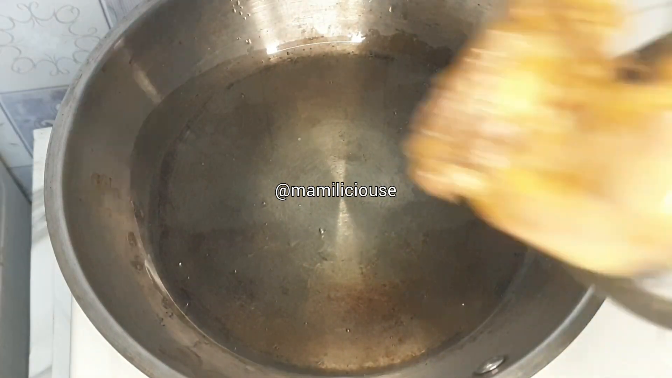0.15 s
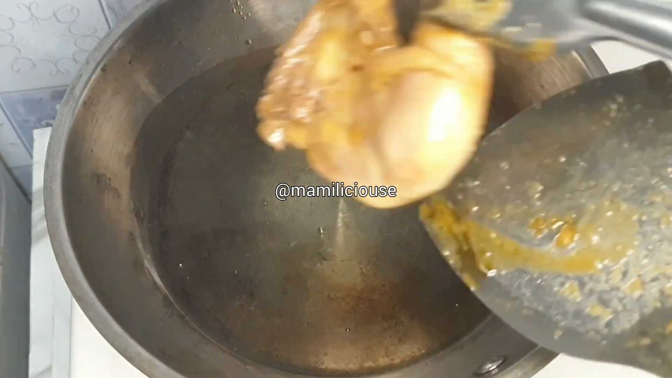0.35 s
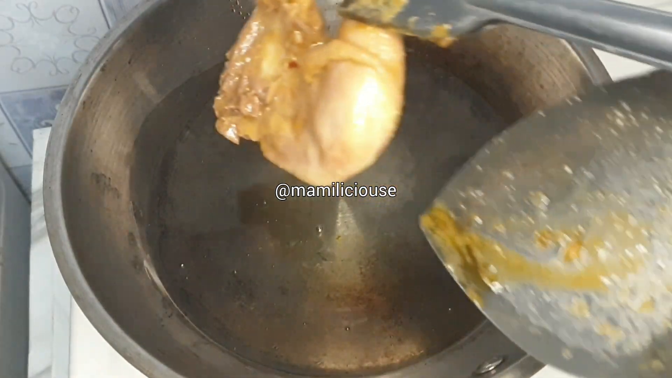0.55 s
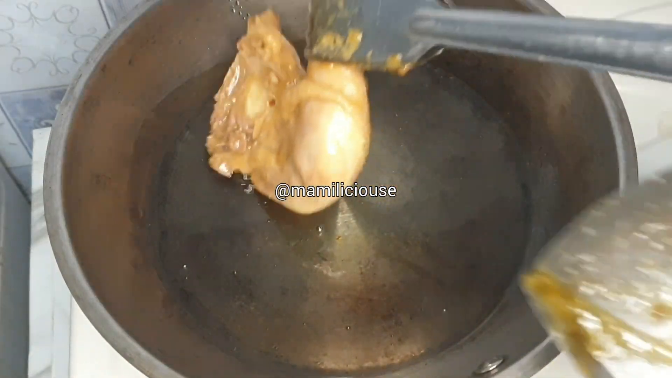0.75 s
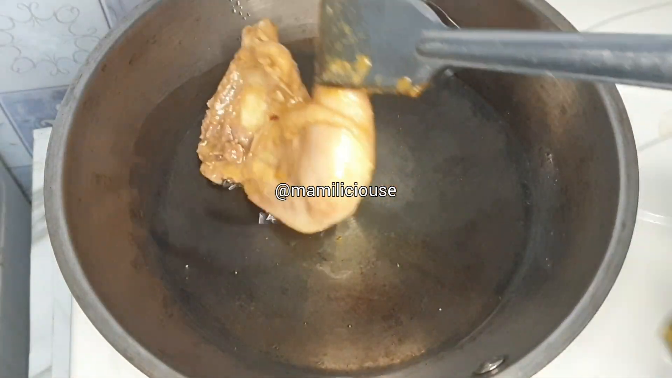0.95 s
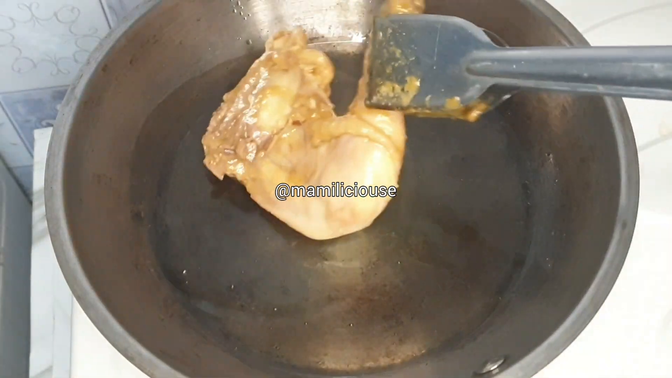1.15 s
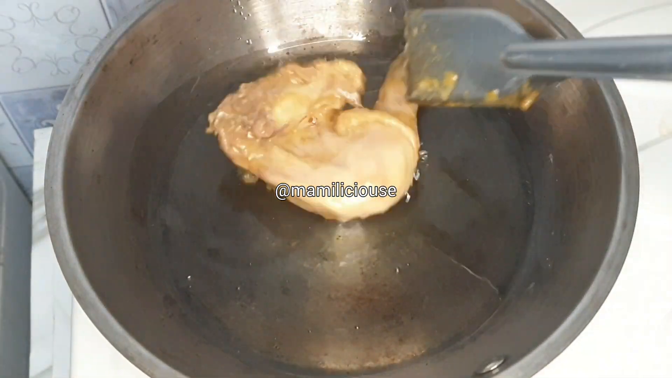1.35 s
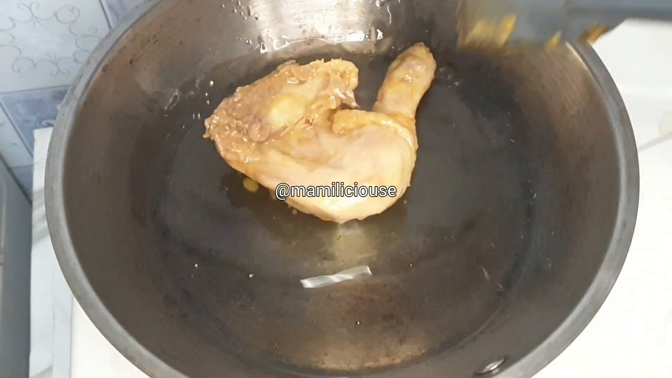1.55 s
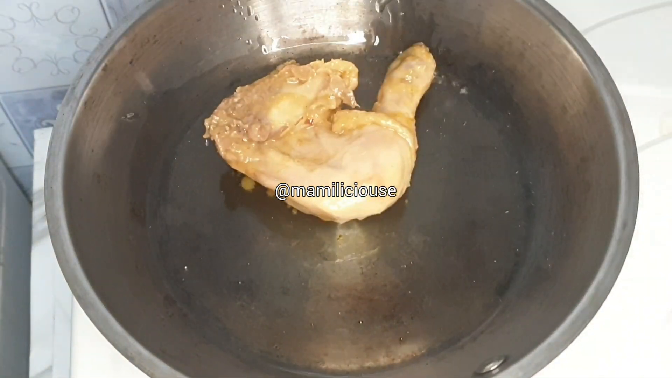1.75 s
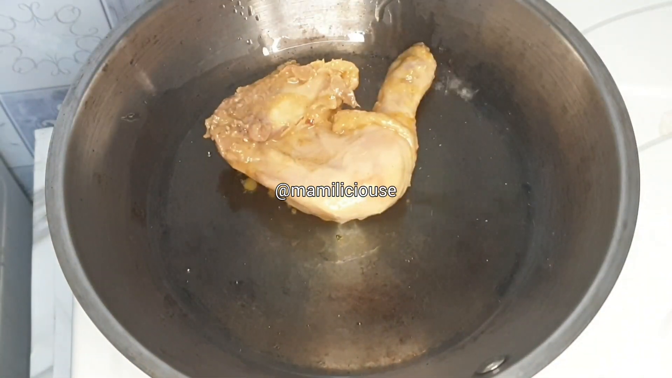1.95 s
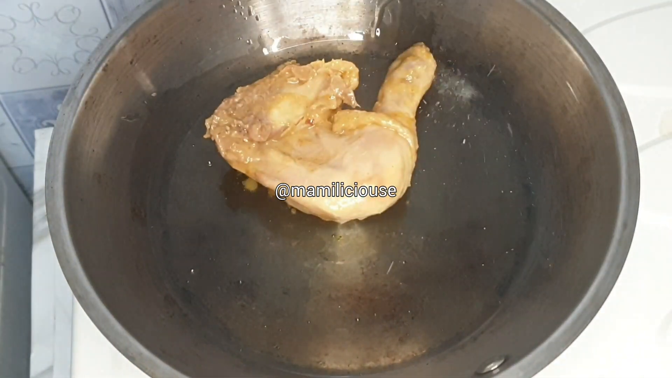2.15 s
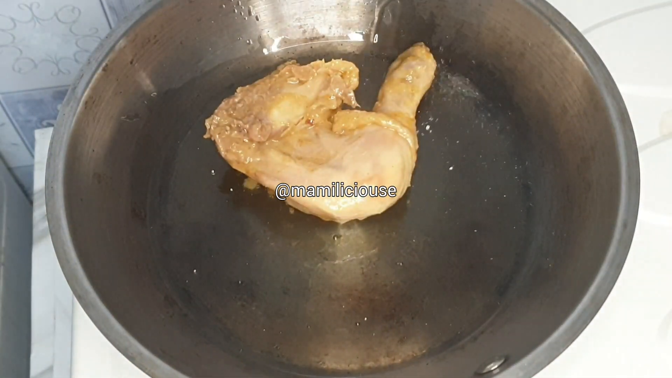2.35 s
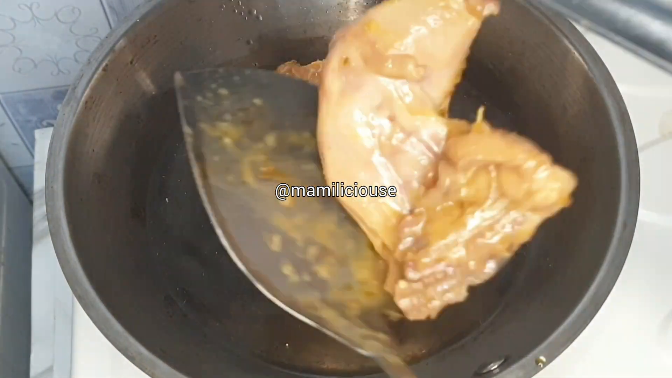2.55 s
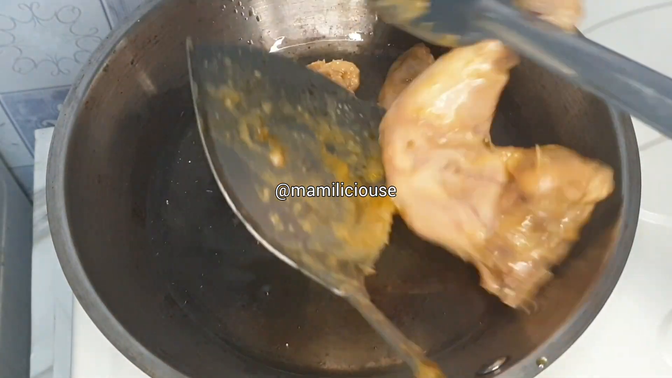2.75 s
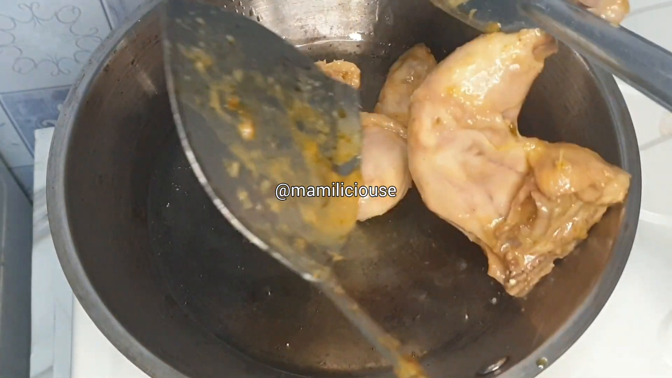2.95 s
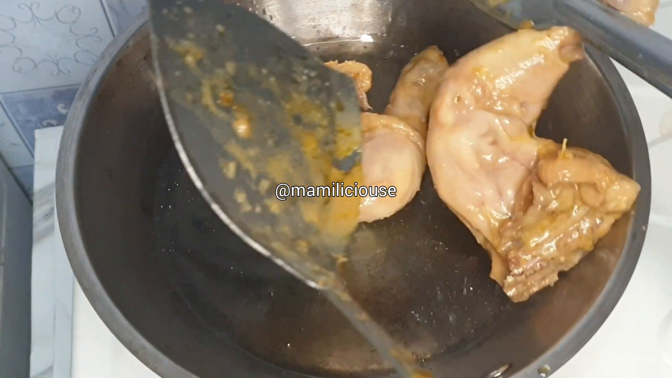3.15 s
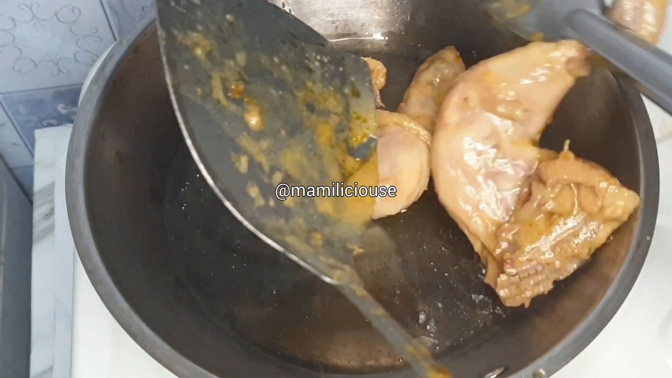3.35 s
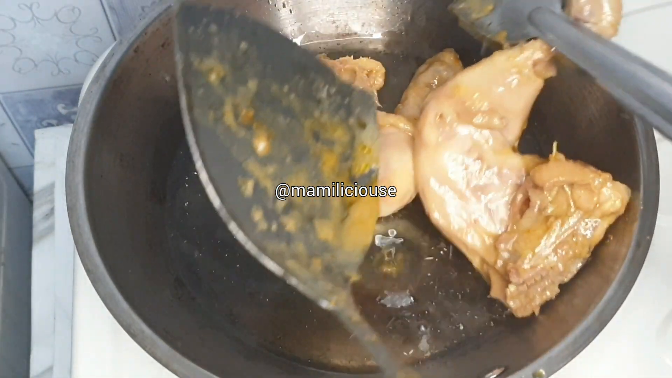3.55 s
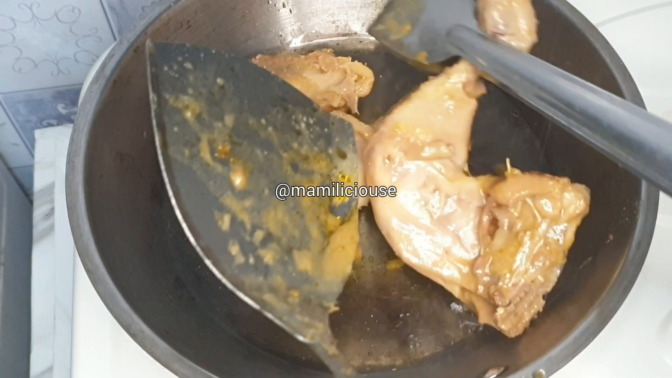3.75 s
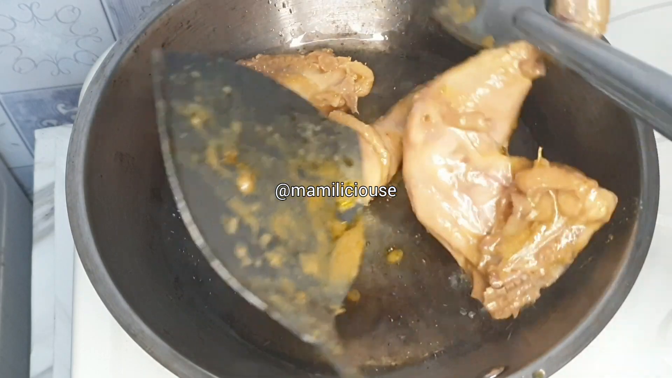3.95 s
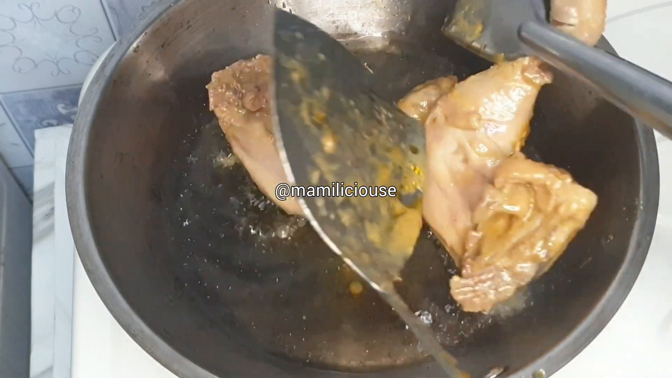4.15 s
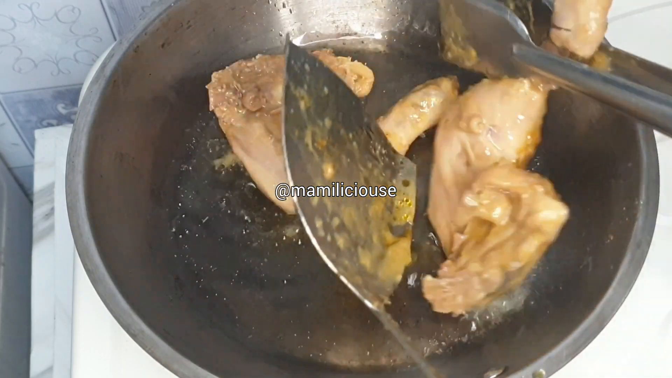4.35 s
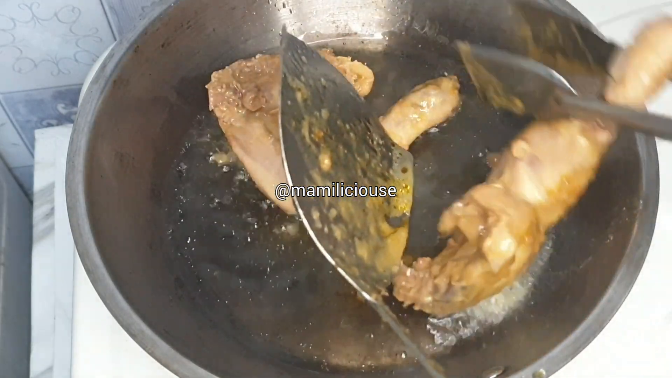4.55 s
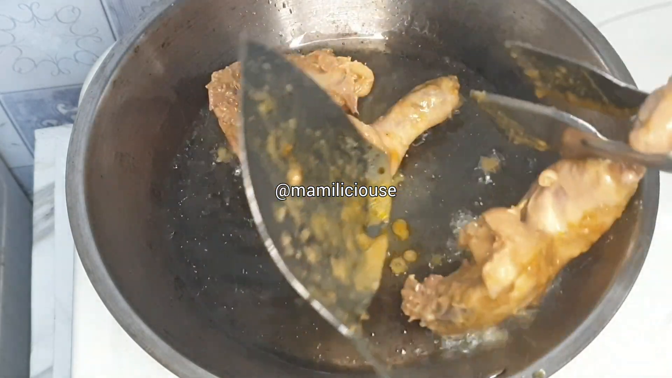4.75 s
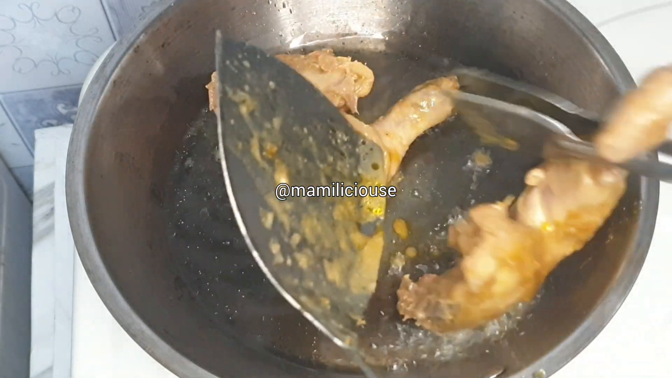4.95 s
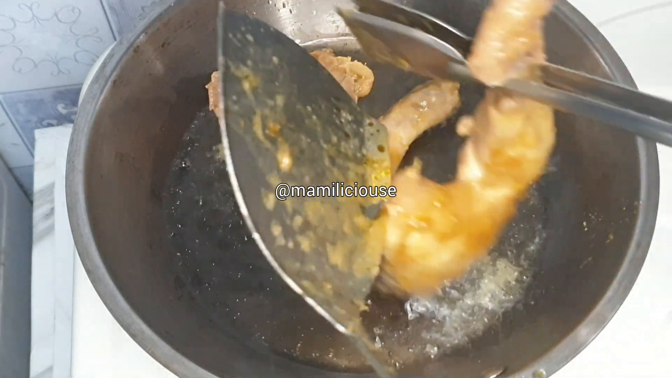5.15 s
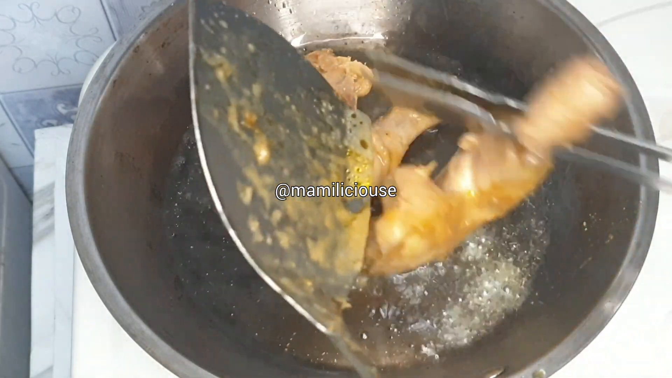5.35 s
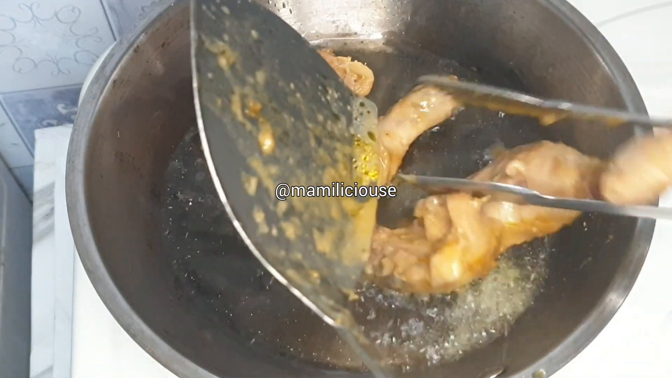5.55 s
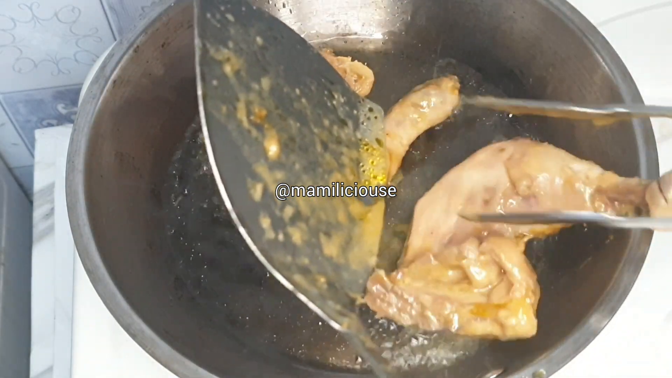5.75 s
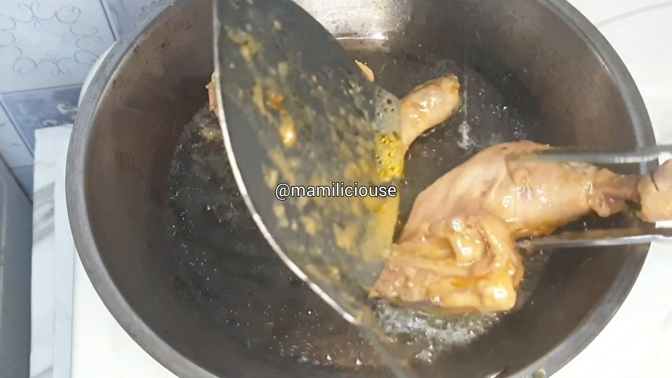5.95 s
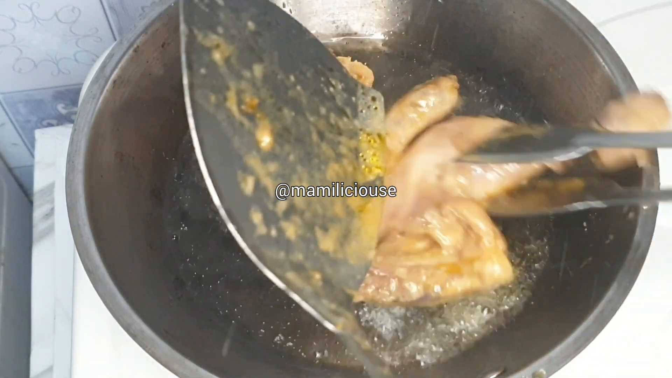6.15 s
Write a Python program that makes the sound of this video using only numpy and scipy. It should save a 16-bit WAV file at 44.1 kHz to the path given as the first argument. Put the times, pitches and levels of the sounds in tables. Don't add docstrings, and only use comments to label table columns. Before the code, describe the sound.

Close above a metal pot in a home kitchen, two microphones hear faint flame rumble, a utensil tick and a snap of oil ringing in the pot. Meat touches down with uneven, metallic sizzling. The view switches to vigorous frying full of loud snapping bubbles, cut by a split-second silence. Gentler crackling continues, with small tong knocks, dipping and slowly swelling again. The sound sits slightly left.

```python
import sys
import numpy as np
from scipy import signal
from scipy.fft import rfft, irfft, next_fast_len
from scipy.io import wavfile

SR = 44100
rng = np.random.default_rng(int(sys.argv[2]) if len(sys.argv) > 2 else 0)


def boost_factor(decibels):
    exponent = np.asarray(decibels, float) / 20
    return 10 ** exponent


def unload_wav(signal):
    wavfile.write(
        sys.argv[1],
        SR,
        np.round(np.clip(np.atleast_2d(signal).T, -1, 1) * 32767).astype(np.int16),
    )


N = 272979
M = next_fast_len(N)
HZ = np.fft.rfftfreq(M, 1 / SR)
T = np.arange(N) / SR
TOUCH_S = 0.779


def evened(x):
    return x / np.sqrt(np.mean(x ** 2) + 1e-20)


def read(points, hz):
    f, value = np.transpose(points)
    return np.interp(np.log(hz + 1), np.log(f + 1), value)


def filtered(x, gain):
    return irfft(rfft(x, M) * gain, M)[..., :N]


def add(mix, s, sound):
    part = mix[:, round(s * SR):][:, :sound.shape[1]]
    part += sound[:, :part.shape[1]]


def panned(sound, pan_db):
    return sound * boost_factor(np.array([[pan_db / 2], [-pan_db / 2]]))


def resonate(x, hz, width):
    pole = np.exp((2j * np.pi * hz - np.pi * width) / SR)
    return 2 * signal.lfilter([1 - abs(pole)], [1, -pole], x).real


def wander(low_hz, high_hz):
    gain = (HZ > low_hz) / np.sqrt(HZ + 1) / (1 + (HZ / high_hz) ** 2)
    return evened(filtered(rng.standard_normal(N), gain))


# frequency in Hz, likeness from 0 to 1.
LIKENESS = [(30, 1), (100, 0.95), (300, 0.85), (700, 0.85), (1500, 0.33), (4000, 0.54), (9000, 0.33),
            (15000, 0.31)]
# frequency in Hz, lead in radians.
LEFT_LEAD = [(0, -1.5), (1550, 0.79), (4570, -0.9), (5080, -2.5), (7410, -1), (11800, -11), (16400, -25)]


def pair_noise(gain):
    a, b = rfft(rng.standard_normal((2, M)))
    same = np.clip(read(LIKENESS, HZ), 0, 1)
    shifted = a * np.exp(-1j * read(LEFT_LEAD, HZ))
    right = same * shifted + np.sqrt(1 - same ** 2) * b
    return evened(irfft(np.array([a, right]) * gain, M)[:, :N])


def fuzzy_tones(peaks, unrest_db, sharpen):
    shake = pair_noise(1)
    mix = np.zeros((2, N))
    for hz, width, db in peaks:
        mix += boost_factor(db + unrest_db * wander(3.6, 30)) * evened(resonate(shake, hz, sharpen * width))
    return evened(mix)


# time in seconds, level in dB, bubble size from -1 (fine) to 1 (coarse).
STEAM = [(0.8, -34, -0.27), (0.9, -40.5, .2), (1.09, -35, 0.29), (1.19, -42.5, -0.18), (1.386, -48, -0.66),
         (1.389, -40, -1.1), (1.53, -30, 0.088), (1.95, -33, -0.12), (2.02, -25, -0.081),
         (2.14, -29, -0.013), (2.506, -31, 0.069), (2.52, -41, 0.27), (2.76, -40, 0.27), (2.9, -37, -0.32),
         (3.4, -37.5, -0.13), (4.1, -35, 0.14), (4.8, -34, -0.13), (6.19, -31.5, 0.5)]


def steam(column=1):
    rows = np.array(STEAM)
    value = np.interp(T, rows[:, 0], rows[:, column])
    growth_db = 900 * np.maximum(rows[0, 0] - T, 0)
    return value - np.where(T < TOUCH_S, 200, growth_db) * (column == 1)


# start in seconds, left-right level in dB, delay of the right microphone in samples.
VIEWS = [
    (0, 4, 5),
    (1.388, 1.8, -1),
    (2.51, 3.5, 4),
]


def side_db(column=1):
    rows = np.array(VIEWS)
    return rows[np.searchsorted(rows[:, 0], T, "right") - 1, column]


def waking():
    return np.clip((T - TOUCH_S) / 0.024, 0, 1) ** 3


# frequency in Hz, level in dB per Hz.
FRY_COLOUR = [(180, -46), (300, -19.5), (378, -19.5), (527, -21.5), (722, -18), (1310, -14.5), (1520, -9.5),
              (1950, -9.5), (2670, -4), (3310, -6), (5010, -2.5), (7580, -10), (8370, -17.5), (11700, -10),
              (15700, -18.5)]


def fry_colour_db():
    return read(FRY_COLOUR, HZ)


def pot(x, t60=0.11, wet_db=-2.5):
    t = np.arange(4000) / SR
    tail = rng.standard_normal((2, 4000)) * boost_factor(-60 * t / t60) * (t > 0.0004)
    return x + boost_factor(wet_db) * signal.oaconvolve(x, tail / np.linalg.norm(tail[0]), axes=1)[:, :N]


def bubble(hz, cycles, glide=0.035):
    turns = np.arange(int(SR / hz * 40) + 8) * hz / SR
    shape = (1 - np.exp(-turns / 3.4)) * np.exp(-turns / cycles)
    rise = 1 + glide * np.minimum(turns / cycles, 3) / 3
    return shape / shape.max() * np.sin(2 * np.pi * turns * rise)


# frequency in Hz, level in dB per Hz.
ROOM_COLOUR = [(13, -53), (22, -21), (97, -2.5), (151, -11.5), (292, -18), (364, -25), (507, -26),
               (566, -31), (928, -30.5), (1130, -37.5), (2180, -41.5), (3780, -55), (5110, -46),
               (8390, -66), (15800, -64)]


def burner():
    rumble = pair_noise(boost_factor(read(ROOM_COLOUR, HZ)))
    drone = evened(resonate(pair_noise(1), 85, 10.6))
    drone = evened(resonate(drone, 85, 25.0))
    level_db = -47.5 - 15 / (1 + np.exp((2.53 - T) / 0.29))
    jets = pair_noise(boost_factor(fry_colour_db() + 4.6 * np.log2(HZ / 5000 + 0.0073)))
    return evened(rumble + boost_factor(-4) * drone) * boost_factor(level_db) + jets * boost_factor(-76.5) * (T < TOUCH_S)


# start in seconds, peak in dB, pitch in Hz, time to fade by 60 dB in seconds.
BUMPS = [(.1312, -35, 780, 0.0057), (0.076, -43.5, 56.7, 0.34), (1.39, -43.5, 348, 0.36),
         (1.7, -41, 66, 0.18), (2.742, -35, 2640, 0.11), (2.77, -48, 332, 0.32), (3.2, -49, 76, 0.24),
         (3.1, -47.5, 130, 0.21), (3.395, -49, 371, 0.31), (3.42, -53, 147, 0.32),
         (3.429, -50.5, 74.5, 0.54), (5.691, -43.5, 369, 0.21), (5.701, -42.5, 144, 0.49),
         (5.7, -51, 74.4, 0.44), (5.69, -45, 830, 0.22)]


def bumps():
    mix, t = np.zeros((2, N)), T[:SR // 2]
    for s, db, hz, t60 in BUMPS:
        rough = 0.77 * evened(resonate(rng.standard_normal(len(t)), hz, 0.47 * hz))
        rough = rough - np.sin(2 * np.pi * hz * t)
        shape = boost_factor(db - 60 * t / t60) * (1 - np.exp(-t * hz / 0.92))
        add(mix, s, panned(shape * rough, 1.2))
    return mix


# frequency in Hz, width in Hz, level in dB.
SCRAPE_TONES = [(1350, 35, 3), (1720, 18, -10), (2150, 25, 1)]
# start in seconds, hold in seconds, level in dB.
SLIDES = [(.1, .12, -69), (.38, .02, -71)]


def scrape():
    slide = np.zeros(N)
    for s, hold, db in SLIDES:
        inside = np.minimum(T - s, s + hold - T)
        slide += boost_factor(db) * np.clip(1 + inside / 0.05, 0, 1) ** 2
    return fuzzy_tones(SCRAPE_TONES, 2.2, 1.1) * slide


# start in seconds, peak in dB, left-right level in dB.
SPIT = [(0.4184, -24, -1.5)]
# frequency in Hz, level in dB, time to fade by 60 dB in seconds.
SPIT_RING = [(4220, -13, 0.64), (4400, -24, 0.22), (4660, -25, 5.0), (4960, -12, 0.47), (5222, -6, 0.11),
             (5491, -8, 0.22), (5900, 7, 0.13), (6056, -3, 0.33), (6428, -15, 0.35), (6815, -8, 0.22),
             (7200, -9, 0.19), (7634, -22, 0.32), (7900, -22, 0.22)]
# frequency in Hz, level in dB per Hz.
SPIT_PUFF = [(700, -36), (3000, -24), (5500, -10), (7000, 1), (8500, -20), (12000, -19), (15800, -23)]


def spit():
    mix, t = np.zeros((2, N)), T[:SR // 2]
    s, db, pan_db = SPIT[0]
    puff = evened(filtered(rng.standard_normal((2, N)), boost_factor(read(SPIT_PUFF, HZ))))[:, :len(t)]
    puff = puff * (boost_factor(-9.0 - 60 * t / 0.031) + boost_factor(-17.0 - 60 * t / 0.34))
    beat = np.array([[1.002], [0.998]])
    ring = np.zeros((2, len(t)))
    for hz, ring_db, t60 in SPIT_RING:
        phase = rng.uniform(0, 2 * np.pi, (2, 1))
        fade = boost_factor(0.88 * ring_db - 60 * t / min(t60, 0.45))
        ring += fade * np.sin(2 * np.pi * hz * beat * t + phase)
    add(mix, s, panned(boost_factor(db) * (puff + boost_factor(-16.5) * ring), pan_db))
    return mix


# frequency in Hz, width in Hz, level in dB.
WALL_TONES = [(475, 26, -15.5), (747, 17, -12), (955, 106, -0.5), (1415, 130, 1.5), (1620, 61, -3),
              (2230, 41, -2.5), (2560, 90, -1), (2670, 29, -15), (3470, 32, -5), (3830, 44, -23),
              (4260, 27, -21), (4380, 27, -2), (4930, 39, 6), (6070, 150, -12), (6330, 63, -3),
              (7100, 51, -2)]


def wall():
    level_db = steam() + 5.5 - 8 * (T - TOUCH_S)
    ending = np.clip((VIEWS[1][0] - T) / 0.02, 0, 1)
    return fuzzy_tones(WALL_TONES, 3.6, 0.75) * waking() * boost_factor(level_db) * ending


def stray_pops(count=150):
    when, size, kind, tune, ring = rng.random((count, 5)).T
    crowd = np.cumsum(boost_factor(0.9 * steam()))
    at = np.searchsorted(crowd, (np.arange(count) + when) / count * crowd[-1]).clip(0, N - 1)
    favoured_hz = np.array([3700, 4700, 5600, 11300])
    hz = favoured_hz[(kind * 4).astype(int)] * (1 + 0.22 * (2 * tune - 1))
    db = steam()[at] + 18 - 1.2 * T[at] + 3.0 * (2 * size - 1)
    return list(zip(T[at], db, hz, 1.5 + 5.0 * ring))


# start in seconds, peak in dB, pitch in Hz, length in cycles.
POPS = [(0.9056, -18, 7030, 13), (0.9582, -20, 3470, 6.9), (1.0866, -16, 4900, 16), (1.279, -12, 4500, 5.6),
        (1.3927, -10.5, 10100, 6), (1.4052, -10.5, 9900, 7.5), (1.4148, -15, 12140, 9.8),
        (1.4242, -13, 10500, 14), (1.574, -4, 11100, 11), (1.667, -8.5, 11100, 8.4),
        (1.694, -12, 4930, 2.8), (1.7685, -5.5, 3510, 5.2), (1.8436, -6.5, 6100, 3.3),
        (1.868, -5, 11820, 3), (1.904, -10, 5650, 9.2), (2.0262, -7, 11600, 9), (2.1113, -11.5, 4660, 15),
        (2.2015, -11, 3880, 9.3), (2.259, -20, 1700, 5), (2.28, -12, 3730, 12), (2.3198, -4.5, 5240, 3.1),
        (2.334, -13, 1490, 2.4), (2.353, -7.5, 5000, 5.8), (2.389, -5, 5130, 4.7),
        (2.4495, -12.5, 4800, 10), (2.6777, -16, 1670, 2.1), (2.6355, -25.5, 3840, 16),
        (3.232, -18, 4800, 16), (3.4906, -15, 4130, 3.2), (4.5082, -20, 1860, 3)]


def pops():
    rings, cracks = np.zeros((2, 2, N))
    rows = POPS + stray_pops()
    pans = side_db()[[int(row[0] * SR) for row in rows]] - 3.5 + 5 * rng.standard_normal(len(rows))
    rags = rng.standard_normal((len(rows), 130)) * boost_factor(-9.0 - 60 * T[:130] / 0.004)
    rags[:, 0] = 1
    for (s, db, hz, cycles), pan_db, rag in zip(rows, pans, rags):
        ring = boost_factor(db - 5.0) * bubble(hz, 0.37 * max(cycles, 0.5))
        add(rings, s, panned(ring, pan_db))
        add(cracks, s + 0.00017, panned(boost_factor(db) * rag / np.sqrt(max(cycles, 1)), pan_db))
    no_bass = 1 / (1 + (600 / (HZ + 1)) ** 4)
    mix = rings + boost_factor(13.0) * filtered(cracks, boost_factor(fry_colour_db()) * no_bass)
    mix[1] = np.roll(mix[1], -1)
    return pot(mix, t60=0.03, wet_db=-7)


def scattered(per_s, spread_db, clumps, reach=7.5):
    at = np.flatnonzero(rng.random(N) < per_s / SR * clumps)
    size, place = rng.random((len(at), 2)).T
    size = boost_factor(spread_db * np.minimum(-np.log(size + 1e-9), 3.6))
    size = size * (-1.) ** np.arange(len(at))
    side = boost_factor(6.0 * (place - 1.0))
    late = np.round(side_db(column=2)[at] + reach * (place - 0.5)).astype(int)
    train = np.zeros((2, N + 40))
    train[0, at + 12] = size * side
    train[1, at + 12 + late] = size / side
    return train[:, :N]


def drift():
    knots = np.arange(0, T[-1] + 1, 1 / 5)
    return boost_factor(2.5 * np.interp(T, knots + rng.random() / 5, rng.standard_normal(len(knots))))


# lowest in Hz, highest in Hz.
SIZES = [
    (600, 3200),
    (3200, 8000),
    (8000, 16500),
]
# bursts per second, length in cycles, size spread in dB, fine hiss in dB.
BURSTS = [
    (699, 4, 3, -4.5),
    (1184, 6.4, 3, -4),
    (1210, 3.8, 4.5, -2),
]


def frying():
    share_db = [-6, 0, 0.67 - 9 * steam(2)]
    gulps = boost_factor(1.3 * wander(14, 250))
    colour = boost_factor(fry_colour_db())
    cracks = pot(scattered(270, 4.5, gulps ** 2))
    mix = waking() * boost_factor(-4.5) * evened(filtered(cracks, colour))
    for k, ((low, high), (per_s, cycles, spread_db, hiss_db)) in enumerate(zip(SIZES, BURSTS)):
        bursts = np.zeros((2, N))
        for hz in np.geomspace(low, high, 25)[1::2]:
            grain = bubble(hz, cycles * rng.uniform(0.21, 0.7))
            grain *= np.sqrt(hz) / np.linalg.norm(grain)
            clicks = drift() * scattered(per_s / 12, spread_db, gulps ** 2)
            bursts += signal.oaconvolve(clicks, grain[None], axes=1)[:, :N]
        band = 1 / np.sqrt((1 + (low / (HZ + 1)) ** 8) * (1 + (HZ / (0.75 * high)) ** 12))
        hiss = pair_noise(band * colour) * gulps
        layer = evened(evened(filtered(pot(bursts), colour)) + boost_factor(hiss_db) * hiss)
        mix += layer * boost_factor(share_db[k]) * (waking() if k == 0 else 1)
    side = boost_factor((side_db() - 2.0) / 2)
    return mix * boost_factor(steam()) * np.array([side, 1 / side])


def scene():
    return burner() + bumps() + scrape() + spit() + wall() + pops() + frying()


# frequency in Hz, left-right level in dB.
LEAN = [(60, 2.5), (120, 2.5), (240, 4), (480, 4), (950, 5), (1890, 4), (3770, 7), (7520, 0.5),
        (15000, 7.5)]


def microphones(dry):
    lean = boost_factor(read(LEAN, HZ) * np.array([[0.5], [-0.5]]))
    return filtered(dry, lean * np.clip((16125 - HZ) / 150, 0, 1))


def top_cut(x):
    return signal.sosfilt(signal.butter(12, 16810, fs=SR, output="sos"), x)


def record(dry):
    gate = np.clip(np.maximum(2.5065 - T, T - 2.5172) / 0.0008, 0, 1)
    return top_cut(microphones(dry) * gate)


dry = scene()
out = record(dry)
unload_wav(out)
```